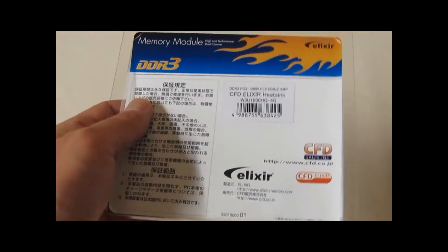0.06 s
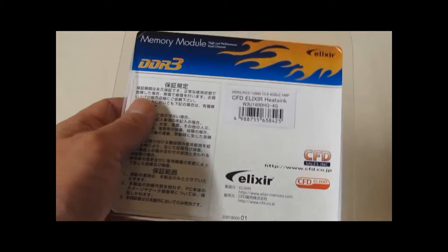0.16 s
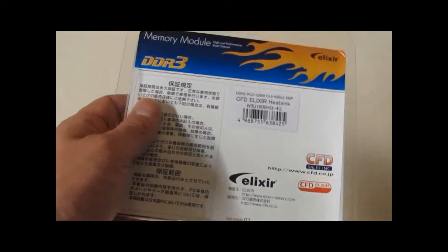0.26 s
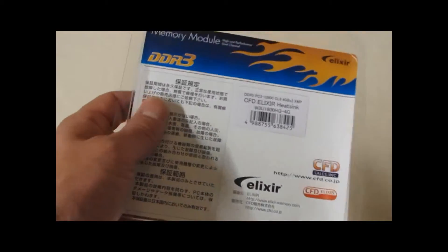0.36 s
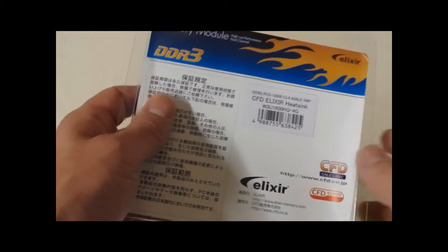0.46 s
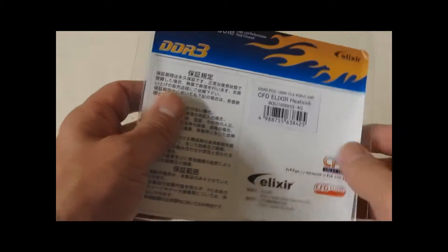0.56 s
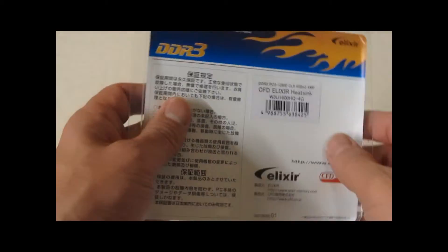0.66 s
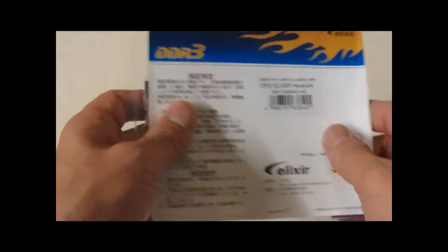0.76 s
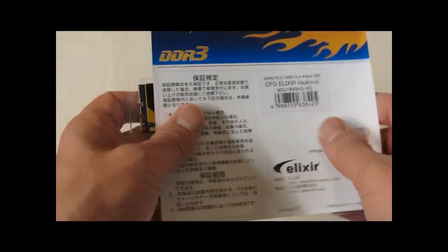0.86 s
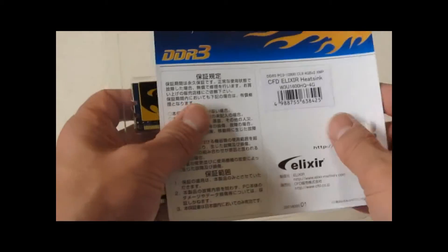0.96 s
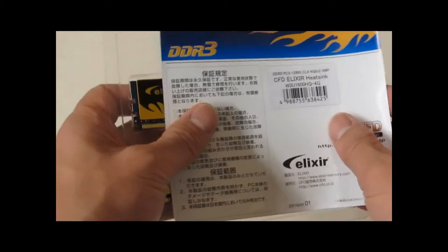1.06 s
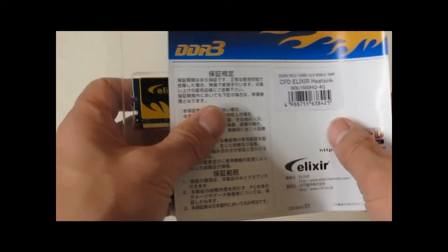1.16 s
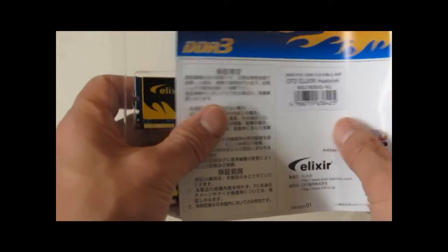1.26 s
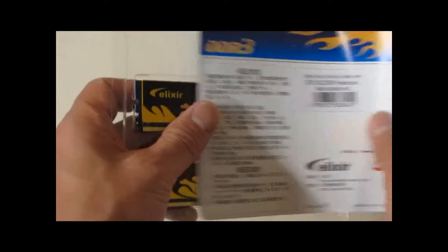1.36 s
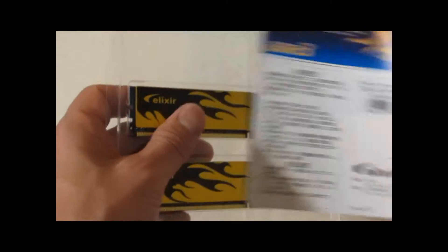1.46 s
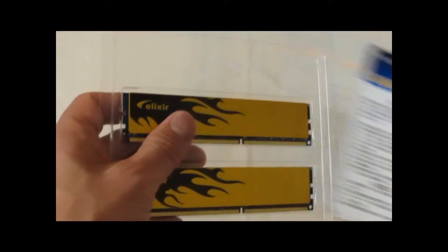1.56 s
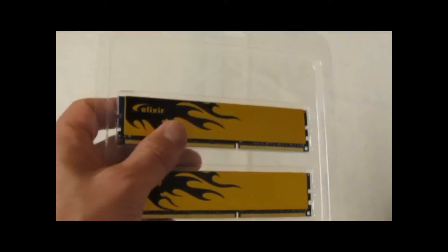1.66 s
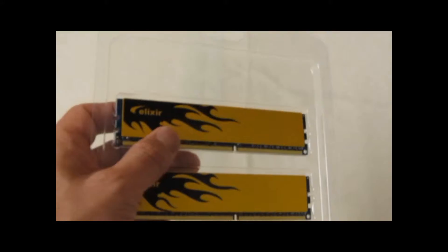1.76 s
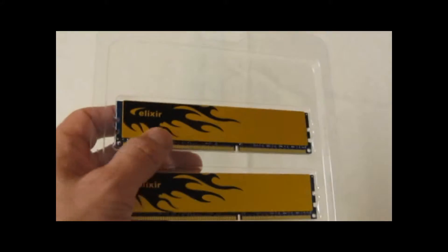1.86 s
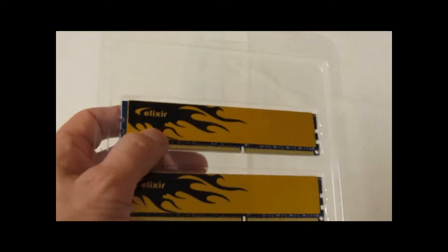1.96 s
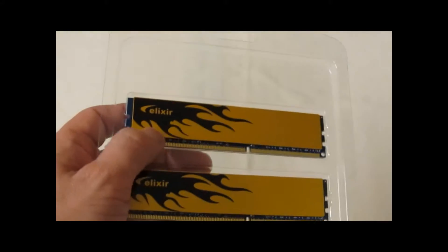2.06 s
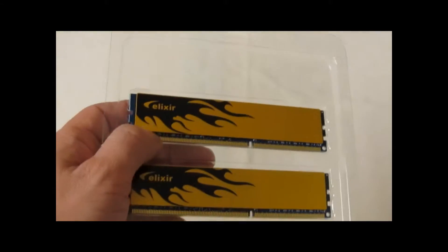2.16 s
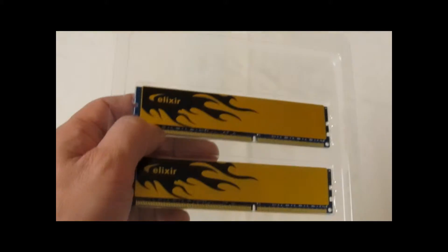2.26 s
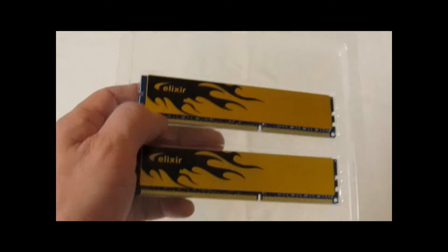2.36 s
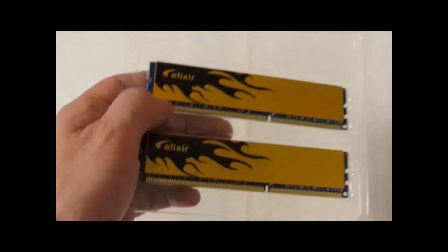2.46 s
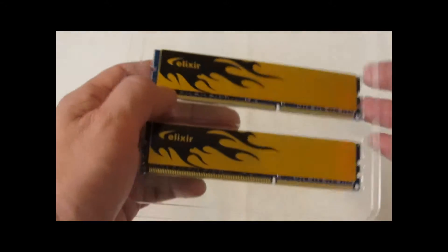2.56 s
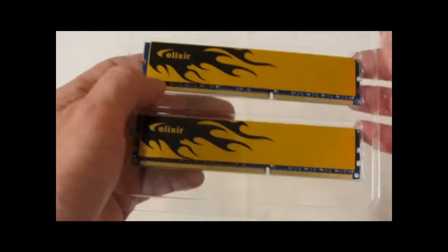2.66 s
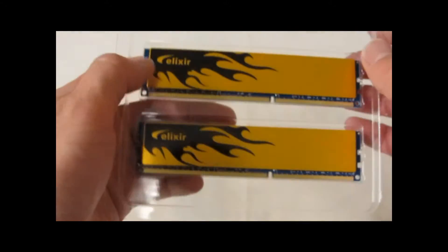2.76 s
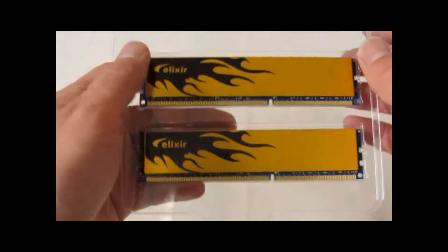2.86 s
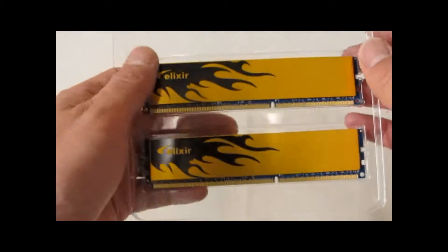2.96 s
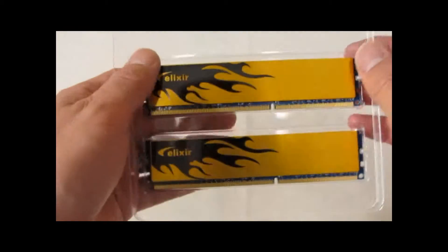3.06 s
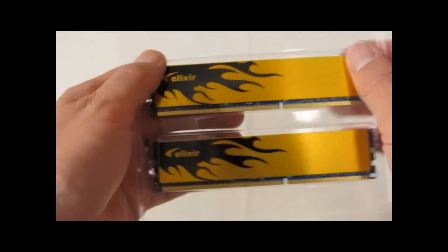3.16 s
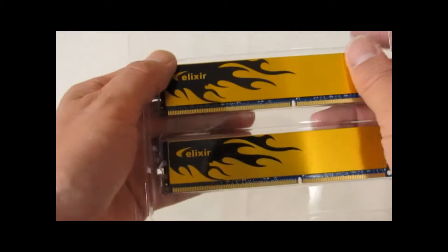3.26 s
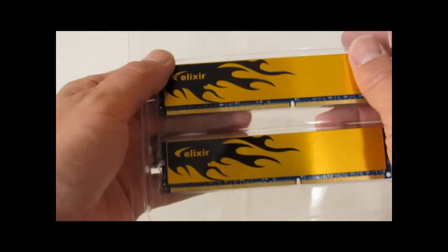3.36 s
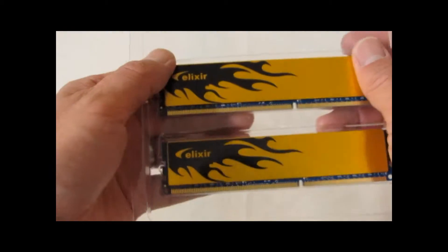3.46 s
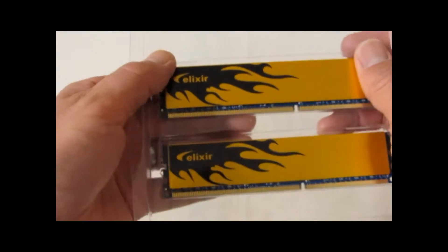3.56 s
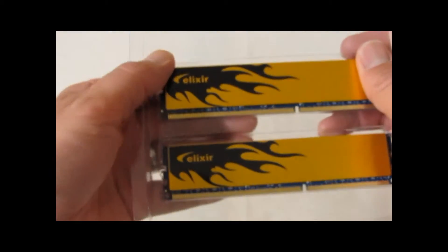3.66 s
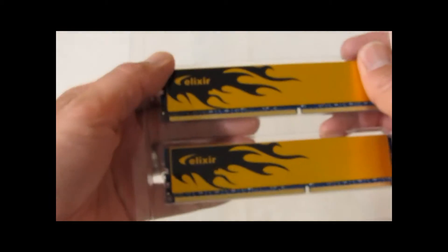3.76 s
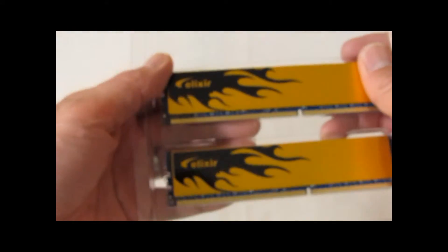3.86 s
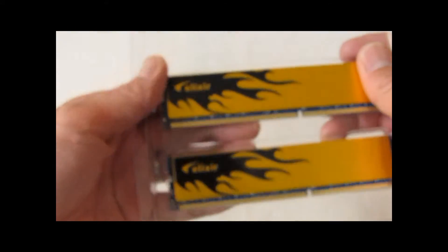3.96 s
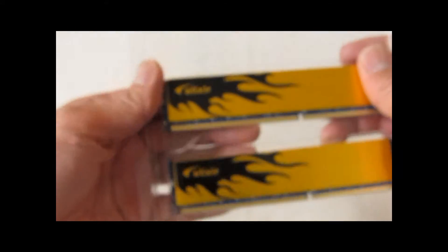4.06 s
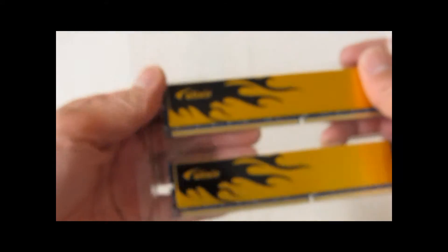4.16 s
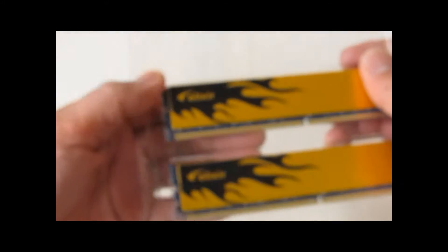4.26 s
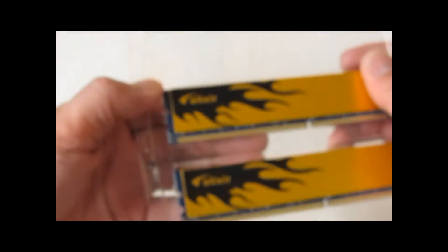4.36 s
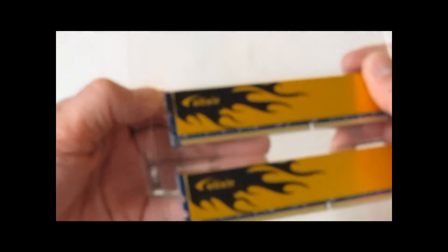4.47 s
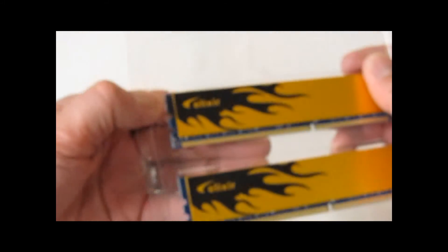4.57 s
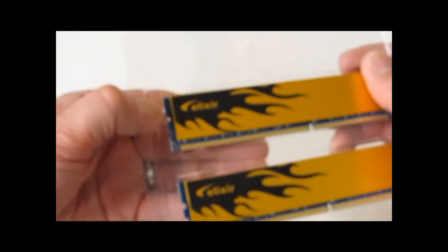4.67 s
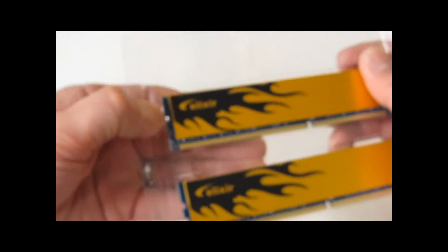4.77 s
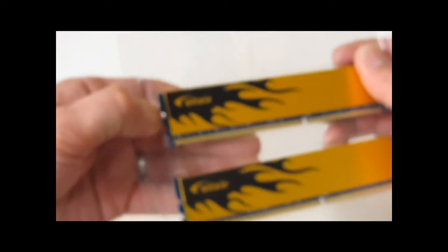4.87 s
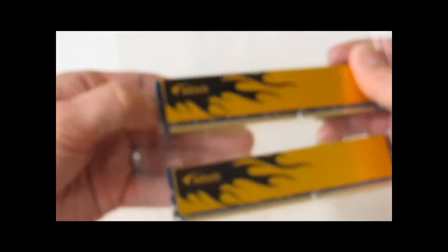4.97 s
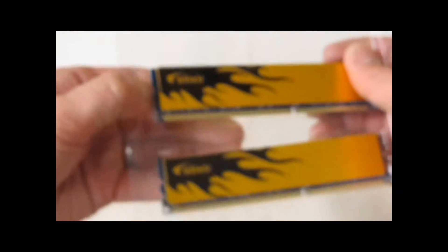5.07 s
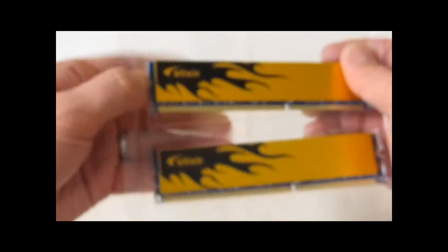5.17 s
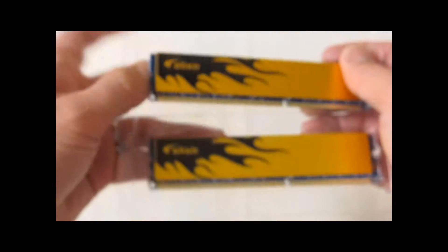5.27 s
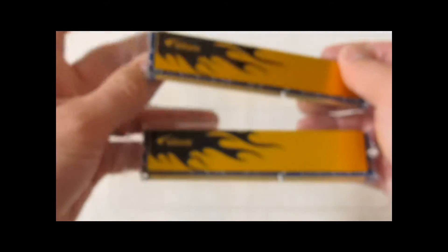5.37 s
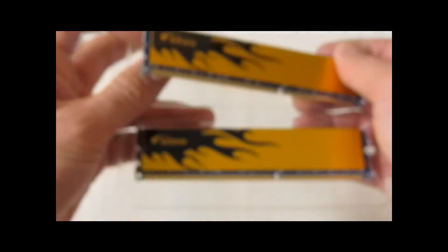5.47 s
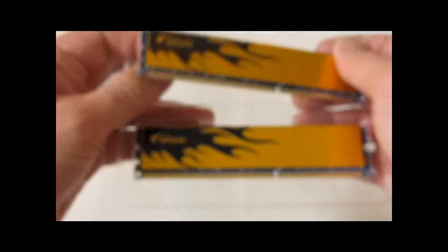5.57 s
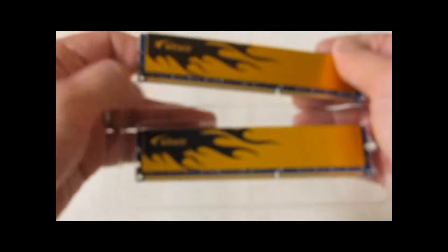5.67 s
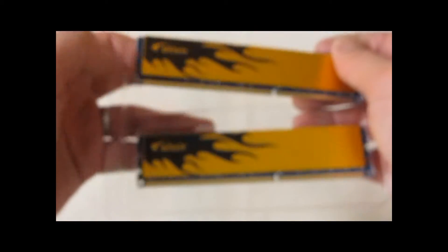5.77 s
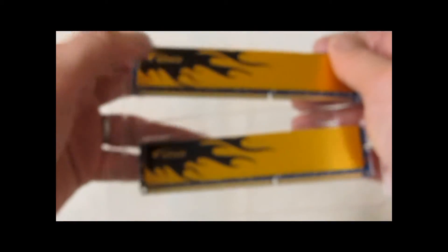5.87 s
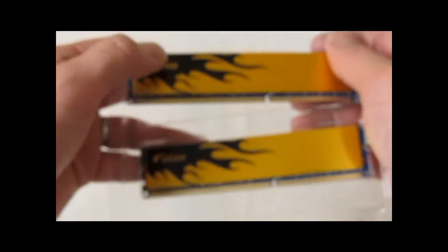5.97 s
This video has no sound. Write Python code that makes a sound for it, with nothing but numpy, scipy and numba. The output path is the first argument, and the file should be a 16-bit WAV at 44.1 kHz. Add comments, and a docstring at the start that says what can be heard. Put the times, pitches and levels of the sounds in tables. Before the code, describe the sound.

A close stereo pickup in a small indoor room, with a faint steady low hum, a weak fan tone and soft hiss throughout. After nearly half a second of quiet, small scuffs and ticks begin. From 0.6 to 1.05 s stiff thin plastic crackles and scuffs densely, with one loud sharp snap near 0.87. From about 1.06 to 1.58 a card slides off in a dry, stuttering scrape, ending in a bright cluster of snaps and a short rattle around 1.65. A few faint scuffs follow, with a light click at 2.4. Clicks and crinkles return at 2.67-2.93, with scuffs and a crackly rattle to 3.35. The hardest double crack, with a dull knock, comes at 3.53, another strong snap at 3.77, soft thumps at 3.82, and a moderate click with loose rattle at 4.31. Sparse scuffs, small ticks and a dull tap at 5.26 remain, with last little clicks near 5.8-5.9.

```python
"""In a small room, hands slide a card off a stiff clear plastic tray, flex the tray and press parts out of it.
Buckling walls snap and crinkle as decaying bursts of force; scuffs, rattles and the slide are stick-slip noise.
Every force is split into panel rings and bands, then excites the resonant modes of the tray.
Two close microphone ports hear it with the room's diffuse tail, over mains hum, a fan tone and hiss.
The gain control, at first still recovering from an earlier loud sound, ducks after loud snaps."""
import sys
import numpy as np
from scipy import signal
from scipy.fft import rfft, irfft
from scipy.io import wavfile
from scipy.ndimage import uniform_filter1d
from numba import njit

SR = 44100
rng = np.random.default_rng(int(sys.argv[2]) if len(sys.argv) > 2 else 0)


def makeup_ratio(level_db):
    """Linear amplitude ratio for a level in decibels (20 dB per factor of ten)."""
    decades = np.asarray(level_db, float) / 20
    return 10 ** decades


def dump_mix(stems):
    """Bounce the given channels to the path in sys.argv[1] as a 16-bit WAV at rate SR."""
    frames = np.atleast_2d(stems).T  # one column per channel
    limited = np.clip(frames, -1, 1)  # hard clip at full scale
    pcm = np.round(limited * 32767).astype(np.int16)
    wavfile.write(sys.argv[1], SR, pcm)


N = 264600
FORCE_TIME_S = np.arange(8192) / SR  # time axis of one brief contact


def unit(x):
    """Normalisation: scales a signal to an rms of 1."""
    return x / np.sqrt(np.mean(x ** 2) + 1e-30)


def read(table, hz):
    """Spectral interpolation: reads an (f, value) table on a log-frequency axis."""
    f, v = np.transpose(table)
    return np.interp(np.log(hz + 1), np.log(f + 1), v)


def walk(rate):
    """Slow random modulation: levels drawn at a rate in Hz, held, then smoothed twice."""
    k = int(SR / rate)
    held = np.repeat(rng.standard_normal(N // k + 1), k)
    return 0.97 * uniform_filter1d(uniform_filter1d(held, k), k)[:N]


def hiss():
    """Coloured noise: two independent noises mix to a left-right correlation that varies with frequency."""
    # spectrum of the hiss: f/Hz, relative level/dB
    hiss_colour = [(20, -25), (50, -8), (90, -6.5), (150, -6.5), (260, -2.5), (450, -7.5), (860, -10.5),
                   (2000, -12.5), (4500, -20), (7000, -27), (10000, -32.5), (13500, -27.5), (14800, -48),
                   (15500, -29)]
    # correlation of left and right: f/Hz, coefficient
    likeness = [(60, 0.15), (130, 0.22), (290, 0.67), (640, 0.36), (1410, 0.38), (3100, -0.067),
                (6820, 0.31), (15000, -0.31)]
    # steady whistling band: f/Hz, width/Hz, boost/dB
    whistle = (5720, 300, 7)
    level_db = -53
    hz = np.arange(N // 2 + 1) * SR / N
    alike = np.clip(read(likeness, hz), -.9, .95)
    mid, side = rfft(rng.standard_normal((2, N)))
    pair = mid * np.sqrt(1 + alike) + side * np.sqrt(1 - alike) * np.array([[1], [-1]])
    centre_hz, width_hz, boost_db = whistle
    bump_db = boost_db * np.exp(-((hz - centre_hz) / width_hz) ** 2)
    colour = makeup_ratio(read(hiss_colour, hz) + bump_db)
    return unit(irfft(colour * pair, N)) * makeup_ratio(level_db + .5 * walk(2.12))


def hum_and_fan():
    """Tonal noise: sinusoids whose level and phase wander slowly, a little stronger on the left."""
    # mains hum, fan tone: f/Hz, mean level/dB rms, scale of the waver/dB
    steady_tones = [(120, -57.5, .9), (296, -64, 2.5)]
    out = np.zeros((2, N))
    for hz, level_db, waver_db in steady_tones:
        phase = 2 * np.pi * hz * np.arange(N) / SR + 0.37 * waver_db * walk(5.48)
        level = np.sqrt(2) * makeup_ratio(level_db + waver_db * walk(4.92))
        out = out + level * np.sin(phase) * makeup_ratio([[.9], [-.9]])
    return out


def band(x, lo_hz, hi_hz):
    """Band limitation: passes one range of frequencies."""
    return signal.sosfilt(signal.butter(2, [lo_hz, hi_hz], "bandpass", fs=SR, output="sos"), x)


def ring(x, hz, q):
    """Resonance: a single damped mode of quality factor q."""
    return signal.lfilter(*signal.iirpeak(hz, q, SR), x)


def grit(size, spread_db):
    """Micro-slip friction: dense noise whose samples have widely scattered sizes."""
    return rng.standard_normal(size) * makeup_ratio(spread_db * rng.exponential(size=size))


def catches(size, depth_db):
    """Stick-slip: the contact grips and lets go every few milliseconds."""
    return makeup_ratio(depth_db * unit(uniform_filter1d(rng.standard_normal(size), size=90)))


def parts(force, panel_hz, body_hz):
    """Spectral division: neighbouring bands alternate in sign so that they do not cancel where they meet."""
    thump = band(force, 130, 560)
    body = ring(force, body_hz, 5) + .4 * band(force, 600, 1800)
    skirt = band(force, 0.81 * panel_hz, 1.61 * panel_hz)  # broad foot of the panel ring
    panel = ring(force, panel_hz, 5.6) + 0.12 * skirt
    rim = ring(force, 7050, 4.4)  # high ring of the tray's rim
    treble = band(force, 4000, 10000) + 1.2 * rim
    air = band(force, 10000, 15600)
    return thump, -body, panel, -treble, air


def strike(force, span_s, level_db, panel_hz, body_hz, thump_db, body_db, treble_db, air_db):
    """Energy partition: each part gets the energy its level holds over the span; bright contacts reach highest."""
    relative_db = np.array([thump_db, body_db, 0, treble_db, 2.4 * treble_db + air_db])
    gains = makeup_ratio(level_db + relative_db) * np.sqrt(span_s * SR / len(force))
    return sum(gain * unit(part) for gain, part in zip(gains, parts(force, panel_hz, body_hz)))


def add(out, s, sound):
    """Stereo scatter: each contact gets a random left-right level offset, and sometimes a sample or so of lag."""
    offset = rng.standard_normal()
    i, lag = int(s * SR), int(round(.5 * offset))  # lag in samples
    out[0, i:i + len(sound)] += sound * makeup_ratio(0.9 * offset)
    out[1, i + lag:i + lag + len(sound)] += sound * makeup_ratio(-.6 * offset)


def grip_hz(s):
    """Boundary conditions: the grip on the tray sets its body ring."""
    # body ring under the changing grip: t/s, f/Hz
    grip = [(0.4, 1400), (1.6, 1320), (2.3, 1170), (3.0, 1140), (3.35, 1260), (3.55, 1220), (3.8, 860),
            (4.5, 870), (5.9, 1110)]
    return np.interp(s, *np.transpose(grip))


def rub(out, s, level_db, length_s, panel_hz, treble_db, shape):
    """Friction excitation: a shaped stick-slip force; a rub that wakes the treble wakes the body too."""
    force = grit(len(shape), 1.76) * catches(len(shape), 1.0) * shape
    body_db = -4.5 + 0.6 * treble_db
    sound = strike(force, length_s, level_db, panel_hz, grip_hz(s),
                   thump_db=body_db - 10.5, body_db=body_db, treble_db=treble_db, air_db=-17)
    add(out, s, sound)


def scuffs(out):
    """Transient friction: card, finger or part on plastic swells, then stops."""
    # short scuffs: t/s, panel level/dB rms over the length, length/s, panel ring f/Hz,
    # treble level/dB re panel
    scuff_events = [(0.42, -57, .03, 2150, -16), (0.615, -48.5, 0.029, 2090, -1),
                    (0.713, -47, 0.059, 2260, -9), (0.772, -55, 0.09, 2440, -6),
                    (0.851, -50, 0.019, 2470, 0), (0.897, -53.5, 0.037, 2100, -3),
                    (0.991, -56.5, 0.054, 3050, -1.5), (1.025, -45.5, .034, 2350, -1.5),
                    (1.59, -51.5, 0.017, 2700, 5), (1.614, -58.5, .028, 2810, 8.5),
                    (1.663, -38.5, 0.021, 3700, -4.5), (1.686, -43, 0.023, 2870, 4.5),
                    (1.7, -60.5, 0.12, 2950, -2), (1.793, -56.5, 0.048, 2710, 2.5),
                    (1.914, -57, 0.038, 1840, 1), (2.245, -59.5, .039, 4150, -1),
                    (2.67, -59, 0.03, 3520, 1.5), (2.709, -39.5, 0.013, 3980, -1),
                    (2.726, -47.5, 0.03, 3840, -2.5), (2.807, -53, 0.026, 4500, 0),
                    (2.835, -54, 0.038, 4470, -7), (3.127, -56.5, .075, 3950, -4),
                    (3.229, -49, 0.038, 3750, -2), (3.284, -57.5, 0.05, 3810, -1),
                    (3.347, -49, 0.069, 3840, -4), (3.851, -61, 0.03, 2430, -1),
                    (4.284, -55, 0.033, 2420, -5), (4.354, -76, 0.044, 2280, -22),
                    (4.428, -59, 0.023, 1940, -1.5), (4.941, -62, .066, 3680, 0),
                    (5.005, -58.5, 0.054, 2300, 1), (5.228, -59, .041, 2950, -1),
                    (5.266, -58.5, 0.03, 2370, -1), (5.404, -62, .045, 2800, 8.5),
                    (5.692, -63.5, 0.069, 3670, 1.5)]
    for s, level_db, length_s, panel_hz, treble_db in scuff_events:
        age = FORCE_TIME_S / np.clip(length_s, .005, .15)
        shape = np.minimum(4 * age, 1) * np.exp(-age ** 4)
        rub(out, s, level_db, length_s, panel_hz, treble_db, shape)


def snap_force(t60_s):
    """Impulsive excitation: the wall flips over at once, then the panel chatters as it settles."""
    decay = np.exp(-np.log(1000) * (FORCE_TIME_S / max(t60_s, .003)) ** 1.03)
    force = grit(len(FORCE_TIME_S), 2.2) * decay
    return np.r_[3.5, force[1:]]


def buckle(out, s, level_db, panel_hz, body_db, treble_db):
    """Snap-through buckling: a flipped wall sounds briefly, and harder snaps stop sooner."""
    t60_s = 0.019 * np.exp(-0.12 * (level_db + 43.5))  # 19 ms at -43.5 dB
    sound = strike(snap_force(t60_s), 1 / 200, level_db, panel_hz, grip_hz(s),
                   thump_db=body_db - 14, body_db=body_db, treble_db=treble_db, air_db=-11)
    add(out, s, sound)


def snaps(out):
    """Buckling instability: stressed walls of the tray flip one by one."""
    # buckling snaps: t/s, panel level/dB rms over 5 ms, panel ring f/Hz,
    # body level/dB re panel, treble level/dB re panel
    snap_events = [(0.434, -50, 3140, -12, -10), (0.4797, -49.5, 2050, -19, -8),
                   (0.4995, -56.5, 2380, 0, -10), (0.6088, -48.5, 3520, -2, -20),
                   (0.6351, -48, 1930, 8, -20), (0.648, -41, 1990, -3, -8.5), (0.6714, -51.5, 1880, -5, -1),
                   (0.695, -50, 1850, -10, -2), (0.7115, -49.5, 2270, -2.5, -8), (0.784, -51, 2840, -3, -3),
                   (0.7956, -56, 2250, -12, -4), (0.8196, -60, 2190, -10, 0), (0.866, -19, 2230, -21, -32),
                   (0.9262, -54.5, 1810, 8, -1), (0.9784, -53, 2400, 1, 2.5),
                   (1.0369, -39.5, 2820, -28, -13), (1.0738, -47.5, 2450, -14, -4),
                   (1.5337, -64, 2050, -14, 8), (1.584, -36, 2570, -8, 1.5),
                   (1.6448, -29.5, 3400, -4.5, -0.5), (1.6521, -27.5, 3840, -8, -23),
                   (1.67, -39.5, 3800, 2, 1.2), (1.7985, -59, 2700, 15.5, -8),
                   (2.3986, -51, 1810, -3.5, -20), (2.668, -48.5, 3800, -0.5, 0.5),
                   (2.7125, -42, 3180, -1, -21), (2.726, -39.5, 3940, -4, -18), (2.8506, -51, 4380, -8, 2),
                   (2.8794, -53.5, 4260, -1, -4), (2.925, -41, 1830, -2.5, -5),
                   (3.3173, -48.5, 2260, 9, 6.5), (3.3223, -47, 3330, 12.5, 1.2),
                   (3.3346, -39.5, 3480, 2.5, -4), (3.5311, -21, 3800, -1.5, -9),
                   (3.5332, -19, 2850, -9, -49), (3.7683, -24, 3600, -23, -12),
                   (3.7691, -27.5, 2700, -18, -11.5), (3.7004, -55, 1890, 2, -10),
                   (4.3137, -32, 4060, -10, -17), (4.3155, -44, 2220, -12, -15),
                   (4.4078, -53, 3870, 1, -28), (4.7708, -48, 2350, -10, -31),
                   (5.7813, -53, 1810, -0.5, -3), (5.887, -49, 2510, 1, -19)]
    for event in snap_events:
        buckle(out, *event)


def crinkles(out):
    """Random micro-buckling: faint snaps scatter over the spans in which card or tray bends."""
    # spans of bending: start t/s, end t/s
    bending_spans = [(.6, 1), (2.8, 3.3), (4.9, 5.1)]
    crinkles_per_s = 14
    for start, end in bending_spans:
        for a, b, c, d in rng.random((int(crinkles_per_s * (end - start)), 4)):
            buckle(out, start + (end - start) * a, level_db=-59.5 + 6 * b, panel_hz=1800 + 1800 * c,
                   body_db=-8, treble_db=-6 + 12 * d)


def rattles(out):
    """Repeated loose contact: a stick-slip force right after a loud snap fades exponentially."""
    # rattles: t/s, panel level/dB rms over the length, length/s, panel ring f/Hz, treble level/dB re panel
    rattle_events = [(0.867, -30.5, 0.02, 2240, -6), (1.648, -28.5, 0.0082, 3500, -1),
                     (3.324, -37.5, 0.035, 3680, -0.5), (3.534, -35, 0.0041, 2750, -3),
                     (3.768, -38, 0.0093, 2620, -2.5), (4.317, -53.5, 0.13, 2730, -2.5)]
    for s, level_db, length_s, panel_hz, treble_db in rattle_events:
        shape = np.exp(-1.5 * FORCE_TIME_S / np.clip(length_s, .005, .15))
        rub(out, s, level_db, length_s, panel_hz, treble_db, shape)


def slide():
    """Sustained friction: the card drags over the tray, shifting between a low and a high panel resonance."""
    # slide of the card: t/s, panel level/dB, treble level/dB re panel, reach from low panel to high (0-1)
    slide_course = [(1.056, -46, -2, 0.4), (1.085, -55, -12, 0), (1.11, -50, -5, 0), (1.145, -53.5, -8, 0),
                    (1.16, -64, -10, 0), (1.185, -48.5, -9, 0.5), (1.208, -61, -1, 0.2),
                    (1.286, -56.5, -5.5, 0.3), (1.323, -41.5, -7.5, 0.7), (1.355, -47, -6, 1),
                    (1.385, -49, -1, 0.6), (1.422, -53, 1.5, 0.5), (1.46, -47.5, -1, 0.1),
                    (1.502, -44, -2, 0.06), (1.54, -50.5, -2.5, 0.5), (1.583, -59, 2, .6)]
    s, *columns = np.transpose(slide_course)
    time = np.arange(N) / SR
    level_db, treble_db, reach = (np.interp(time, s, column) for column in columns)
    reach = np.clip(reach, 0, 1)
    force = grit(N, 2.0) * catches(N, 1.8) * makeup_ratio(2.0 * walk(39.67))
    _, body, low, treble, air = map(unit, parts(force, panel_hz=2350, body_hz=1070))
    high = unit(parts(force, panel_hz=3110, body_hz=1280)[2])
    panel = np.sqrt(1 - reach) * low + np.sqrt(reach) * high  # equal-power blend
    touch = np.clip(np.minimum(time - s[0], s[-1] - time) / 0.012, 0, 1)
    return touch * makeup_ratio(level_db) * (panel + makeup_ratio(-7.5) * body + makeup_ratio(treble_db) * (treble + 0.26 * air))


def knocks(out):
    """Impact: finger or part strikes the tray dully, with thump and body around the panel ring."""
    # knocks: t/s, panel level/dB rms over 5 ms, panel ring f/Hz, thump level/dB re panel, body level/dB re panel
    knock_events = [(1.657, -44, 2860, 3, 1), (2.9162, -50.5, 1960, -2, 1.5), (3.533, -30, 1800, -0.5, -2),
                    (3.817, -44, 2330, 5, -14), (3.8273, -50.5, 3760, 6, -10), (4.0031, -69, 1920, 5, 14.5),
                    (4.4273, -59.5, 1810, 12.5, 4), (5.2599, -44, 3380, 3.5, 5)]
    for s, level_db, panel_hz, thump_db, body_db in knock_events:
        sound = strike(snap_force(t60_s=0.025), 1 / 200, level_db, panel_hz, 960,
                       thump_db, body_db, treble_db=-3.5, air_db=-11)
        add(out, s, sound)


def tray_modes(x):
    """Modal superposition: the contacts also excite the tray's decaying sine modes."""
    # modes of the tray: f/Hz, relative level/dB, t60/s
    modes = [(390, -3, 0.027), (730, -19, 0.036), (1015, -13, 0.076), (1180, -10.5, 0.018),
             (1457, -9, 0.037), (2050, -58, 0.12), (2350, -36, 0.22), (2750, -37, 0.17),
             (3746, -16.5, 0.043), (4150, -9.5, 0.0075)]
    t = FORCE_TIME_S
    response = np.zeros(len(t))
    for hz, level_db, t60_s in modes:
        mode = np.sin(2 * np.pi * hz * t) * np.exp(-np.log(1000) * t / t60_s)
        response += makeup_ratio(level_db) * unit(mode)
    return x + makeup_ratio(-16) * signal.fftconvolve(x, response[None] / np.sqrt(len(t)), axes=1)[:, :N]


def tray():
    """Linear superposition: all contacts add up and pass through the modes of the tray."""
    out = np.zeros((2, N + len(FORCE_TIME_S)))
    for layer in scuffs, snaps, crinkles, rattles, knocks:
        layer(out)
    return tray_modes(out[:, :N] + slide())


def ports(x):
    """Near-field pickup: two close microphone ports differ in phase and level with frequency."""
    # phase offset of the ports: f/Hz, lead of left/rad
    port_phase = [(0, 0), (2500, -.5), (4000, -1.2), (8000, -1.7), (16000, -2.1)]
    # level offset of the ports: f/Hz, left minus right level/dB
    port_balance = [(100, 1.5), (400, 1.5), (800, -.5), (2500, -2), (5000, 0), (9000, 2), (15000, .5)]
    hz = np.arange(N // 2 + 1) * SR / N
    phase = np.interp(hz, *np.transpose(port_phase))
    half = makeup_ratio(read(port_balance, hz) / 2) * np.exp(.5j * phase)  # half the offset to each port
    return irfft(rfft(x) * np.array([half, 1 / half]), N)


def room(x):
    """Diffuse reverberation: a short noise tail, different on each side, whose treble dies first."""
    t = np.arange(SR // 2) / SR
    onset = np.clip((t - .003) / 0.0037, 0, 1)
    noise = rng.standard_normal((2, len(t))) * onset
    low = band(noise, 150, 6300) * np.exp(-np.log(1000) * t / 0.27)  # t60 in s
    treble = band(noise, 5400, 9200) * np.exp(-np.log(1000) * t / 0.17)
    tail = unit(low + treble) / np.sqrt(len(t))
    return makeup_ratio(-20.5) * signal.fftconvolve(x, tail, axes=1)[:, :N]


@njit
def follow(x, start, attack, release):
    """Envelope detection: a one-pole follower rises fast and sinks slowly."""
    y, e = np.empty(len(x)), start
    for i in range(len(x)):
        e += (x[i] - e) * (attack if x[i] > e else release)
        y[i] = e
    return y


def scene():
    """Superposition of direct sound, reverberation and background noise."""
    near = tray()
    return ports(near) + room(near) + hiss() + hum_and_fan()


def roll_off(x):
    """The treble ends steeply here."""
    return signal.sosfilt(signal.butter(12, 16510, fs=SR, output="sos"), x)


def record(dry):
    """Dynamic compression: gain, still recovering from an earlier loud sound, ducks after each big snap."""
    attack_s, release_s, threshold_db = 0.0046, .45, -29
    peak = np.abs(dry).max(axis=0)
    envelope = follow(peak, 0.27, 1 / (attack_s * SR), 1 / (release_s * SR))
    gain = np.minimum(makeup_ratio(threshold_db) / envelope, 1) ** 0.3
    return roll_off(dry * gain)


dry = scene()
out = record(dry)
dump_mix(out)
```